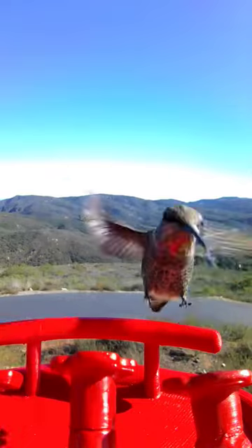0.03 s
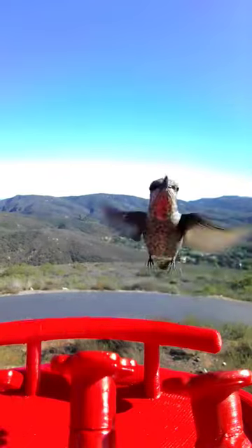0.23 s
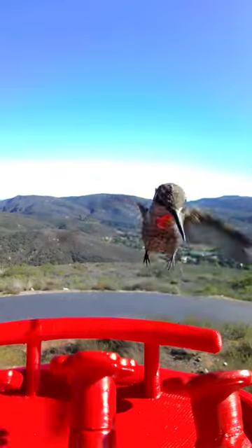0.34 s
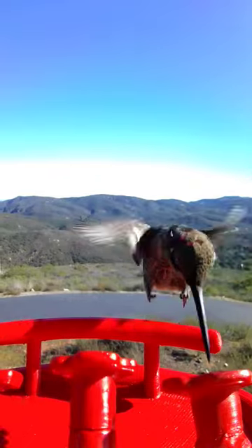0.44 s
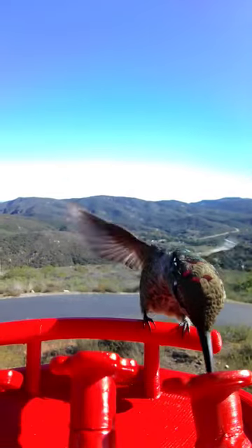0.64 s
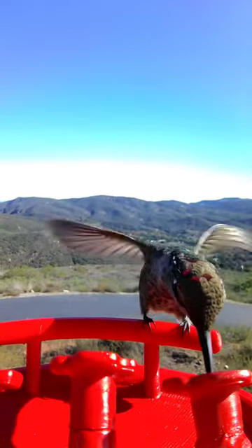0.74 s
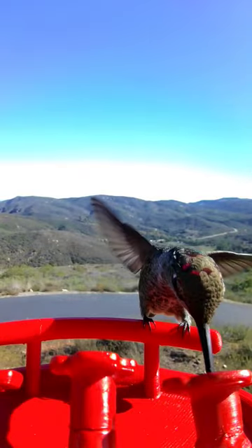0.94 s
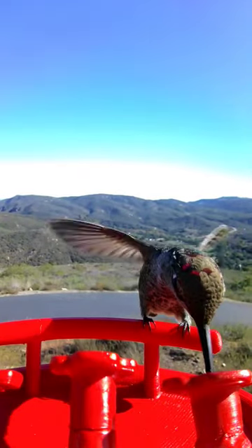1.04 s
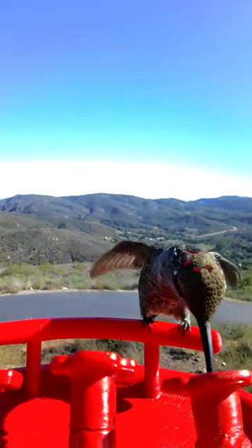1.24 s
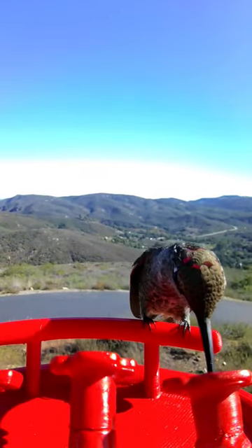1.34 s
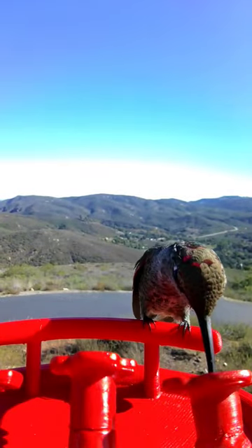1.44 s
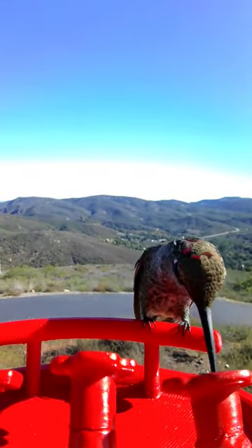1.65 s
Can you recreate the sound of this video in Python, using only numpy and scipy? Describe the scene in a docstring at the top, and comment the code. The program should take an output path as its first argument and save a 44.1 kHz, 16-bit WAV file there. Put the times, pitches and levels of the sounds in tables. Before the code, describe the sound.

Low hum of hummingbird wings, ending in a flutter and faint taps on plastic.

```python
"""A microphone opens on hiss and the faint, even ticking of a small camera's electronics.
Right beside it a hummingbird lifts off a plastic feeder, hovers, brakes and lands, air rushing through
its feathers. Each wingbeat is a low pulse of air, a sharper thump when the bird works hard; the pulses
fuse into a hum, which ends in a few uneven flaps. Then the bill taps softly, exciting the modes of
the plastic, and the tongue makes two tiny wet clicks."""
import sys
import numpy as np
from scipy import signal
from scipy.fft import rfft, irfft
from scipy.io import wavfile
from scipy.ndimage import uniform_filter1d

SR = 44100
rng = np.random.default_rng(int(sys.argv[2]) if len(sys.argv) > 2 else 0)


def to_wav(s):
    """Save 16-bit WAV."""
    ch = np.atleast_2d(s).T  # columns
    pcm = np.round(np.clip(ch, -1, 1) * 32767)  # PCM
    wavfile.write(sys.argv[1], SR, pcm.astype(np.int16))


N = 74970
T = np.arange(N) / SR
FREQS = np.fft.rfftfreq(N, 1 / SR)
FIRST_BEAT_S, LANDING_S = .1005, .592

# Fundamental of the wing motion (time [s], rate [beats/s])
WINGBEAT_RATE = [(.10, 46.5), (.19, 38.7), (.27, 44.3), (.40, 43.1), (.48, 43.9), (.53, 47.3), (.59, 46.3)]
# Strength of the strokes (time [s], level [dB], effort [0-1])
WING_STROKE = [(.10, -45, 1), (.125, -39.5, 0.8), (.15, -48.5, 0.86), (.18, -47, 0.3), (.22, -50, 0.08),
               (.32, -55, 0), (.39, -51.5, 0.12), (.47, -53.5, 0.18), (.50, -48, 0.45), (.54, -40.5, 1),
               (.585, -41.5, 0.86)]


def amp(db):
    """Decibels to amplitude ratio."""
    return 10 ** (np.asarray(db) / 20)


def unit(x):
    """Normalisation to rms 1."""
    return x / np.sqrt(np.mean(x ** 2) + 1e-20)


def curve(table, at, column=1):
    """Linear interpolation of one column of a table."""
    columns = np.transpose(table)
    return np.interp(at, columns[0], columns[column])


def add(mix, s, sound):
    """Superposition of a sound on the mix at time s."""
    part = mix[max(round(s * SR), 0):][:len(sound)]
    part += sound[:len(part)]


def noise(spectrum):
    """Spectral shaping of white noise, at rms 1."""
    hz, db = np.transpose(spectrum)
    gain = amp(np.interp(np.log(FREQS + 1), np.log(hz), db))
    return unit(irfft(rfft(rng.standard_normal(N)) * gain, N))


def pulse(db):
    """Minimum phase gives the most compact causal pulse with this spectrum."""
    log_gain = np.log(amp(np.maximum(np.r_[db, db[-2:0:-1]], -70)))
    return np.fft.ifft(np.exp(np.conj(signal.hilbert(log_gain)))).real


def beat_turns():
    """Phase is the integral of rate: wing cycles counted from the first beat."""
    turns = np.cumsum(curve(WINGBEAT_RATE, T)) / SR
    return turns - np.interp(FIRST_BEAT_S, T, turns)


def hiss():
    """Microphone self-noise and distant air form a stationary noise floor."""
    # Noise spectrum (frequency [Hz], relative density [dB])
    spectrum = [(20, -8), (45, -10), (85, 9.5), (160, 3), (250, 7), (600, 3), (1000, 0), (2000, -3),
                (4000, -3), (10000, -3.43), (13000, -5), (14800, -7.5)]
    return amp(-68) * noise(spectrum)


def feather_rush(fold_s=.656, release_db_per_s=148, flicker_db=2.07, flicker_s=.016):
    """Turbulence in the feathers swells with each stroke, flickers, and dies once the wings fold."""
    # Turbulence spectrum (frequency [Hz], relative density [dB])
    spectrum = [(25, -19.5), (100, 4), (380, 0.5), (600, -10.5), (1200, -22), (2800, -25), (6000, -33.5),
                (14000, -45)]
    stroke_db = curve(WING_STROKE, T)
    db = -55.5 + .5 * (stroke_db - stroke_db.max())
    db -= release_db_per_s * np.maximum(T - fold_s, 0)
    flicker = unit(uniform_filter1d(rng.standard_normal(N), round(flicker_s * SR)))
    swell = 1 + .17 * np.cos(2 * np.pi * beat_turns())
    return noise(spectrum) * amp(db + flicker_db * flicker) * swell


def camera_ticks(frame_hz=30, first_s=.099, low_cut_hz=86):
    """Switching transients: once a frame the electronics tick on, rebound, and tick off more softly."""
    t = (((T - first_s) * frame_hz + .5) % 1 - .5) / frame_hz  # time from the nearest switch-on

    def bump(db, at_s, width_s):
        return amp(db) * np.exp(-.5 * ((t - at_s) / width_s) ** 2)

    on = bump(-54, at_s=0, width_s=.00028)
    rebound = bump(-59, at_s=.00071, width_s=.00073)
    off = bump(-62.5, at_s=.008, width_s=.00062)
    return signal.lfilter(*signal.butter(1, low_cut_hz, "high", fs=SR), rebound - on - off)


def wingbeats(size=4096, dc_db=-28.5, rolloff_db_per_oct=36, upstroke_turn=.57):
    """A periodic train of air pulses makes a harmonic hum; effort sharpens it into single thumps."""
    # Beat spectrum in easy hovering (harmonic [number], relative level [dB])
    hovering = [(1, -31), (2, 2), (3, -8.5), (4, -13.5), (5, -3), (6, 0), (7, 4), (8, -4.5), (9, -3.5),
                (10, -21), (11, -24), (12, -38), (13, -30)]
    # Beat spectrum at full effort (harmonic [number], relative level [dB])
    straining = [(1, -14.5), (2, 2), (3, 1), (4, 2.5), (5, 5), (6, 1.5), (7, 0.5), (8, -4), (9, -3),
                 (10, -24.5), (11, -21), (12, -53), (13, -31)]
    out, turns, hz = np.zeros(N), beat_turns(), np.fft.rfftfreq(size, 1 / SR)
    orders, easy_db = np.transpose(hovering)
    beat_numbers = np.arange(np.interp(LANDING_S, T, turns))
    for s in np.interp(beat_numbers, turns, T):
        rate, effort = curve(WINGBEAT_RATE, s), curve(WING_STROKE, s, column=2)
        scatter_db = 1.4 * (1 - .36 * effort)  # hard strokes are steadier
        db = (1 - effort) * easy_db + effort * curve(straining, orders)
        db += scatter_db * rng.standard_normal(len(orders))
        colour = np.interp(hz / rate, np.r_[0, orders], np.r_[dc_db, db])
        octaves_above = np.log2(np.maximum(hz / rate / orders[-1], 1))
        downstroke = pulse(colour - rolloff_db_per_oct * octaves_above)
        downstroke *= amp(curve(WING_STROKE, s)) / np.sqrt(np.sum(downstroke ** 2) * rate / SR)
        upstroke = amp(-15 - 11 * effort) * downstroke
        add(out, s, downstroke)
        add(out, s + upstroke_turn / rate, upstroke)
    return out


def muffled(x, cutoff_hz=511, order=21):
    """Smooth forcing acts as a low-pass: the thumps of soft wings carry no treble."""
    return irfft(rfft(x) / np.sqrt(1 + (FREQS / cutoff_hz) ** (2 * order)), N)


def lift(lag_s=.0027, attack_s=.016, release_s=.028):
    """Lift oscillates over downstroke and upstroke, radiating the clean low tones of the hum."""
    # Tones of the lift force (harmonic [number], rms level [dB])
    tones = [(2, -55.5), (3, -59.5)]
    turns = np.interp(T - lag_s, T, beat_turns())
    hum = sum(amp(db) * np.sqrt(2) * np.cos(2 * np.pi * order * turns) for order, db in tones)
    rise = np.clip((T - FIRST_BEAT_S) / attack_s, 0, 1)
    return hum * rise * np.exp(-np.maximum(T - LANDING_S, 0) / release_s)


def brushes(relative_width=.1):
    """Friction of feathers and feet makes short swishes of narrow-band noise."""
    # Swishes (time [s], rms level at the crest [dB], centre [Hz], length [s])
    swishes = [(0.12, -78, 4870, 0.046), (.13, -65, 826, 0.011), (0.142, -74, 1250, 0.024),
               (0.256, -72.5, 1170, 0.027), (0.274, -76, 4770, 0.11), (.36, -77.5, 1320, .012),
               (.382, -73, 5000, .01), (0.408, -71, 4640, 0.0084), (0.673, -62, 925, 0.007),
               (0.686, -81, 3400, 0.031), (1.162, -76, 1500, 0.016)]
    out = np.zeros(N)
    for s, db, hz, length in swishes:
        passband = 1 / (1 + ((FREQS / hz - 1) / relative_width) ** 2)
        band = unit(irfft(rfft(rng.standard_normal(N)) * passband, N))
        out += amp(db) * band * np.exp(-2 * ((T - s) / length) ** 2)
    return out


def flaps(width_cycles=.27, cavity_hz=217, cavity_t60=.13):
    """Each flap pulls and pushes the air once, faintly exciting the feeder's cavity resonance."""
    # Uneven flaps at lift-off, landing and folding (time [s], level [dB], pitch [Hz])
    strokes = [(0.188, -37, 168), (.201, -41, 328), (.208, -38, 198), (0.59, -33.5, 227), (.595, -32, 197),
               (.601, -31.5, 300), (0.6072, -30.5, 165), (.6205, -27.5, 232), (0.6497, -34.5, 236),
               (.657, -37.5, 196), (0.709, -62, 152), (.746, -67, 254)]
    out = np.zeros(N)
    for s, db, hz in strokes:
        t, after = T - s, np.maximum(T - s, 0)
        push = np.sin(2 * np.pi * hz * t) * np.exp(-.5 * (t * hz / width_cycles) ** 2)
        ring = np.sin(2 * np.pi * cavity_hz * after) * np.exp(-np.log(1000) * after / cavity_t60)
        out += amp(db) * (push + amp(-11.5) * ring)
    return out


def mode(hz, t60, attack_s):
    """A damped oscillator: a sinusoid that builds up, then decays by 60 dB in t60 seconds."""
    t = np.arange(0, .15, 1 / SR)
    envelope = (1 - np.exp(-t / attack_s)) * np.exp(-np.log(1000) * t / t60)
    return -envelope * np.sin(2 * np.pi * hz * t)


def bill_taps():
    """Each impact of the bill sets the feeder's plastic ringing in its normal modes."""
    # Impacts (time [s], peak level [dB], pitch [ratio])
    impacts = [(.71, -67, 1), (.866, -55.5, 1.02), (.874, -58.5, 1.22), (.922, -60, 1.07), (.94, -86, 1.25),
               (1.048, -59, 1.5), (1.142, -54.5, 1.05), (1.162, -56, 1.37), (1.172, -52, 0.88),
               (1.281, -59.5, 0.99), (1.325, -60, 0.94), (1.513, -65, 1.23), (1.516, -52, 1.03),
               (1.6652, -59, 1.18)]
    # Modes of the plastic (frequency [Hz], relative level [dB], t60 [s])
    plastic_modes = [(408, -17, 0.04), (539, -4.5, 0.035), (717, -5, 0.015), (994, -13, 0.02),
                     (1600, -11, 0.019)]
    out = np.zeros(N)
    for s, db, ratio in impacts:
        ring = sum(amp(level) * mode(hz * ratio, t60, attack_s=.00024)
                   for hz, level, t60 in plastic_modes)
        add(out, s, amp(db) * ring / abs(ring).max())
    return out


def sips():
    """Each wet click of the tongue is one damped oscillation."""
    # Tongue clicks (time [s], level [dB], pitch [Hz])
    clicks = [(.848, -66, 2180), (1.173, -58.5, 2094)]
    out = np.zeros(N)
    for s, db, hz in clicks:
        add(out, s, amp(db) * mode(hz, t60=.058, attack_s=.0016))
    return out


def scene():
    """The pressures of bird, feeder and camera noise superpose in one channel."""
    wings = muffled(wingbeats() + flaps()) + lift() + feather_rush() + brushes()
    return (wings + bill_taps() + sips() + camera_ticks() + hiss())[None]


def record(dry):
    """The microphone opens after a moment, and a low-pass limits its bandwidth."""
    open_s, fade_s, edge_hz = .088, .012, 14850
    opened = dry * np.clip((T - open_s) / fade_s + .5, 0, 1) ** 2
    low_pass = signal.firwin(511, edge_hz, window=("kaiser", 9), fs=SR)
    return signal.oaconvolve(opened, low_pass[None], "same")


dry = scene()
out = record(dry)
to_wav(out)
```